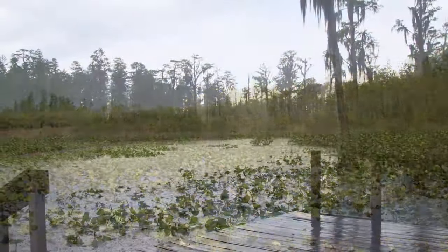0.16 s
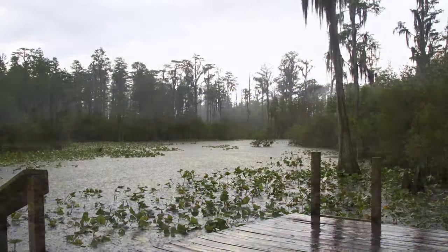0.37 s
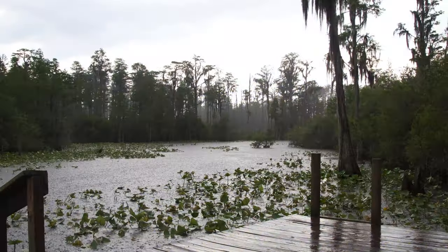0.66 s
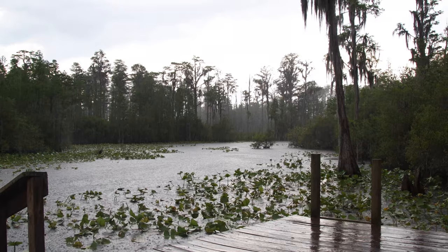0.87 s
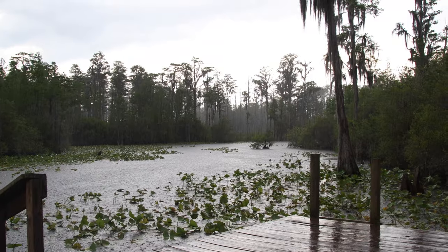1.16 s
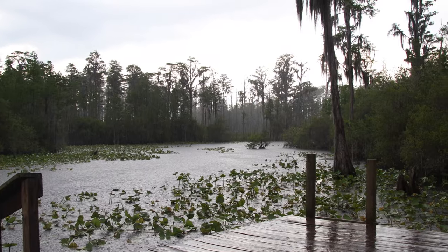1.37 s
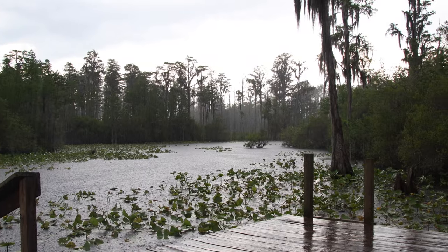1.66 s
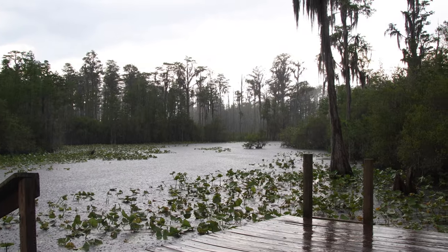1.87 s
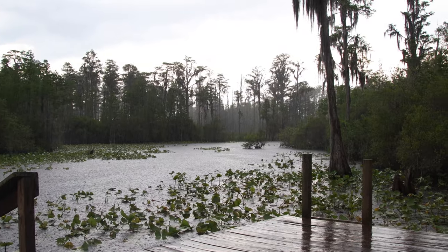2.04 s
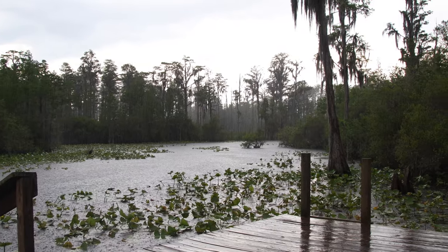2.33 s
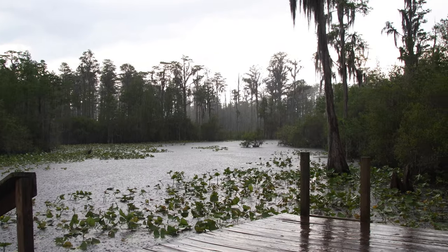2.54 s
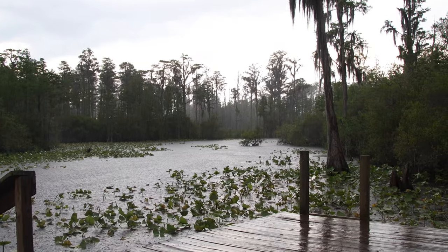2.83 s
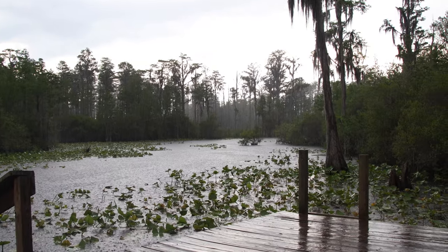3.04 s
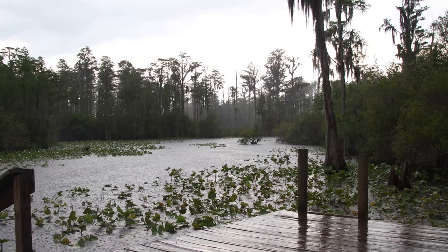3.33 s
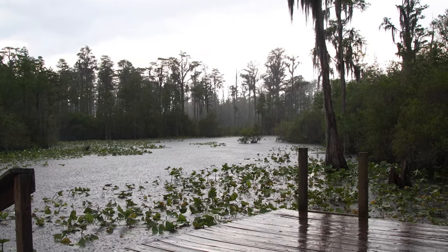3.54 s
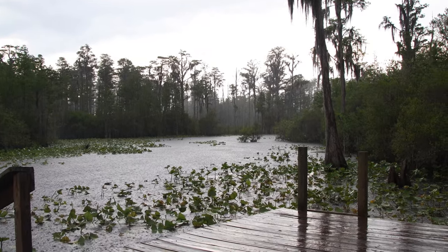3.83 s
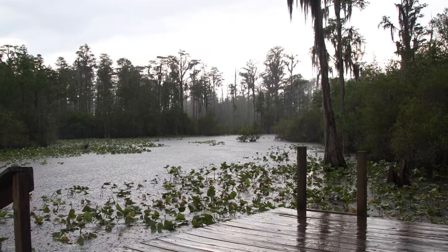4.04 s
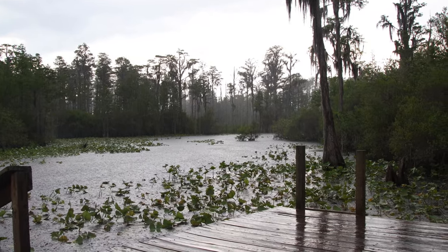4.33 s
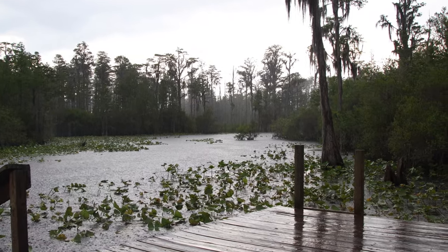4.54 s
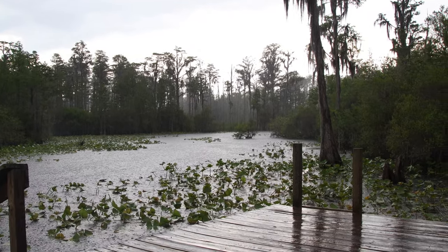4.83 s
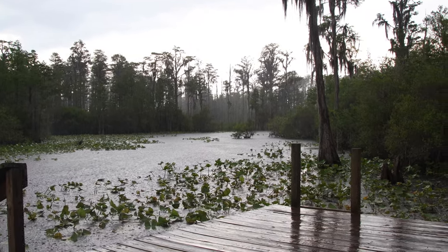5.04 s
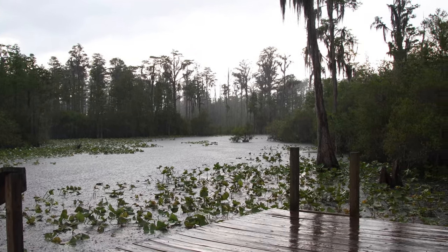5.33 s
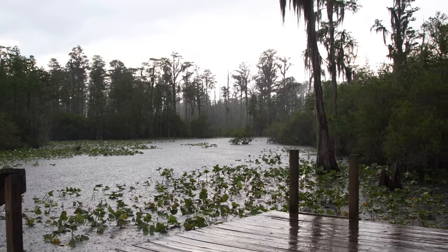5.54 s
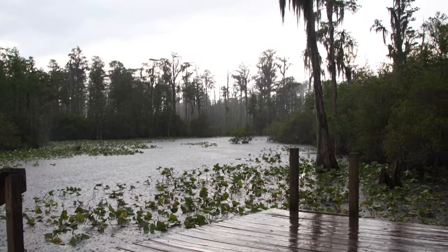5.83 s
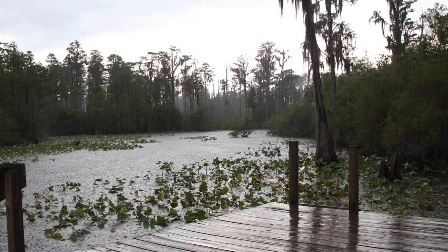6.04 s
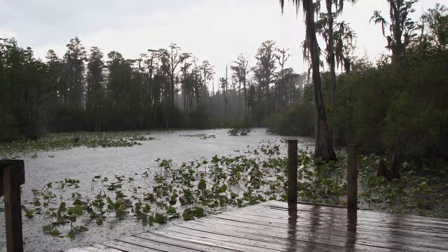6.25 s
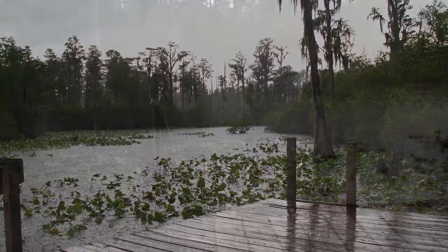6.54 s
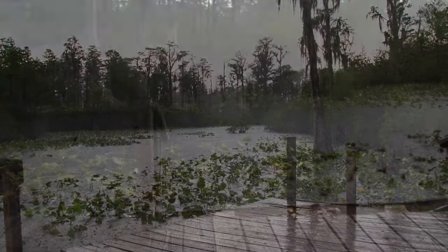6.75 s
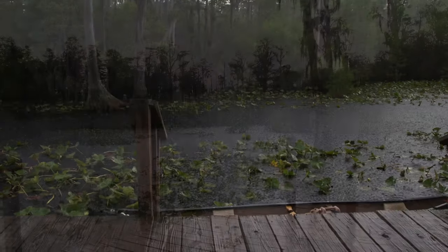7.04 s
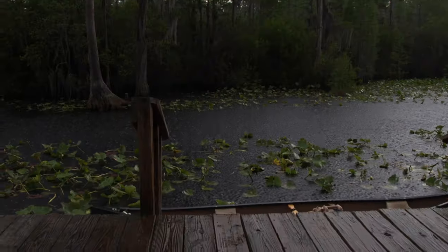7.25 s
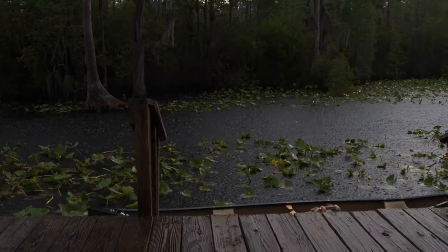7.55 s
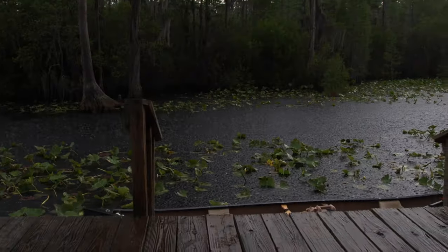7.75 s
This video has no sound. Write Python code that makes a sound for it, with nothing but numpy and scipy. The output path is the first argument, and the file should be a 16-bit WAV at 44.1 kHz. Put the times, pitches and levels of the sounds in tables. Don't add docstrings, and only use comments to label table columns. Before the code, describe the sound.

A tiny fading frog chirp opens, then heavy rain swells to full level almost at once and stays steady. Countless splashes on swamp water blend into a dense hiss, with bright ticks on a rail, knocks on dock boards and rare plops close by. Near the end it blends into a slightly different view of the same rain. Outdoors, wide stereo, small camera under shelter.

```python
import sys
import numpy as np
from scipy import signal
from scipy.fft import rfft, irfft, next_fast_len
from scipy.io import wavfile
from scipy.ndimage import uniform_filter1d

SR = 44100
rng = np.random.default_rng(int(sys.argv[2]) if len(sys.argv) > 2 else 0)


def to_linear_factor(level_db):
    exponent = np.asarray(level_db, float) / 20
    return 10 ** exponent


def materialize(psi):
    bounded = np.clip(np.atleast_2d(psi).T, -1, 1)
    quanta = np.round(bounded * 32767).astype(np.int16)
    wavfile.write(sys.argv[1], SR, quanta)


N = 348610

# start_s, sum_db, difference_db, dulled_above_hz
SHELTER_SMACKS = [
    (0.3, -19, -17, 4500),
    (.5128, -32, -27, 12000),
    (1.494, -31, -30, 12000),
    (2.5852, -28, -23, 12000),
    (2.593, -36, -30, 12000),
    (3.9662, -38, -33, 12000),
]


def evened(x):
    return x / np.sqrt(np.mean(x ** 2) + 1e-20)


def read(points, hz, axis=1):
    rows = np.transpose(points)
    return np.interp(np.log(hz + 1), np.log(rows[0] + 1), rows[axis])


def add(mix, start_s, sound):
    part = mix[:, round(start_s * SR):][:, :sound.shape[1]]
    part += sound[:, :part.shape[1]]


def wash(patchy_db, flicker_db):
    splash_per_s, splash_db, splash_decay_s = 13, 1.77, 0.014
    splash_hz, splash_octaves = 3280, 0.8
    hop = 64
    frames = N // hop + 5
    hz = np.fft.rfftfreq(256, 1 / SR)[:, None]
    a, b, c, d, patches = rng.standard_normal((frames, 129, 5)).T
    patches = uniform_filter1d(patches, size=5, axis=0)
    patches = evened(uniform_filter1d(patches, size=50, axis=1))
    flicker = evened(uniform_filter1d(rng.standard_normal(frames), size=12))
    treble = np.clip(hz / 4000, 0, 1)
    hits = rng.exponential(1, frames) * (rng.random(frames) < splash_per_s * hop / SR)
    decay = np.exp(-hop / SR / splash_decay_s)
    splash = signal.lfilter([1], [1, -decay], np.minimum(hits, 2))
    band = np.exp(-(np.log2((hz + 1) / splash_hz) / splash_octaves) ** 2)
    level_db = patchy_db * patches + flicker_db * treble * flicker + splash_db * band * splash
    spectra = np.array([a + 1j * b, c + 1j * d]) * to_linear_factor(level_db)
    return evened(signal.istft(spectra, nperseg=256, noverlap=192)[1][:, :N])


def patter(per_s, spread_db, low_hz, high_hz, cycles):
    size = to_linear_factor(spread_db * np.minimum(rng.exponential(1, N), 3.3))
    size = size * (rng.random(N) < per_s / SR)
    kind = rng.integers(0, 14, N)
    t = np.arange(600) / SR
    out = np.zeros((2, N))
    for k, hz in enumerate(np.geomspace(low_hz, high_hz, num=14)):
        damped = np.exp(-t * hz / cycles) * np.sin(2 * np.pi * hz * t) * np.sqrt(hz)
        bearing = rng.uniform(0, 2 * np.pi)
        rings = signal.oaconvolve(size * (kind == k), damped)[:N]
        out += np.outer([np.cos(bearing), np.sin(bearing)], rings)
    return evened(out)


def viewpoint(k):
    # hz, gain_db
    sum_response = [
        [(15, -57), (25, -47), (54, -5.5), (112, -10.5), (150, 1), (255, -5.5), (300, -2), (361, -5.5),
         (944, -6.5), (1370, -2), (4810, -19.5), (7000, -20), (9140, -29.5), (11600, -23), (14800, -43.5)],
        [(15, -56), (25, -32), (51, -7), (112, -6.5), (150, 2), (525, -5.5), (1340, -2), (3690, -16.5),
         (4560, -24), (9390, -32), (11000, -28.5), (12600, -33), (14800, -60)],
    ]
    # hz, gain_db
    difference_response = [
        [(35, -69), (60, -63), (87, -36), (488, -10.5), (830, -9.5), (1380, -2), (1770, -4), (2180, -4.5),
         (4260, -7), (4890, -11), (6750, -7.5), (8700, -17), (11200, -10.5), (13800, -25), (14800, -41)],
        [(35, -71), (60, -45), (294, -13), (456, -11), (674, -7), (757, -9), (1290, -1.5), (2230, -2.5),
         (4070, -9), (6910, -18.5), (7400, -19), (10700, -18), (14800, -36)],
    ]
    difference_db = [-4.5, -5]
    # hz, in_step (lean to one side, -1..1), quarter_turn (arrival lag, -1..1)
    likeness = [
        [(172, -0.24, -0.08), (516, -0.4, -0.17), (1033, -0.26, -0.23), (1722, -0.41, -0.24),
         (2756, -0.2, -0.25), (4230, -0.49, -0.14), (5684, -0.24, -0.11), (7579, 0.11, -0.01),
         (10335, 0.03, 0.13), (13781, 0.01, 0.06)],
        [(172, -0.08, -0.01), (516, -0.11, -0.05), (1033, -0.11, -0.01), (1722, -0.12, 0.0),
         (2756, -0.03, -0.03), (4134, -0.09, -0.02), (5684, -0.21, -0.04), (7579, 0.13, 0.0),
         (10335, 0.09, -0.1), (13781, -0.05, 0.03)],
    ]
    # center_hz, width_hz, gain_db
    cavities = [
        (1348, 140, 3),
        (2190, 320, 3),
        (3950, 1400, 2),
    ]

    rain = wash(patchy_db=0.66, flicker_db=1.0)
    rain = rain + to_linear_factor(-16.5) * patter(700, 2.6, 910, 4930, 1.42)
    rain = rain + to_linear_factor(-20.0) * patter(500, 6.2, 5400, 17000, 0.99)
    size = next_fast_len(N)
    hz = np.fft.rfftfreq(size, 1 / SR)
    front, flank = rfft(rain, size)
    link = read(likeness[k], hz) + 1j * read(likeness[k], hz, axis=2)
    tied = link * front + np.sqrt(np.clip(1 - abs(link) ** 2, 0, 1)) * flank
    mid = front * to_linear_factor(read(sum_response[k], hz))
    side = tied * to_linear_factor(read(difference_response[k], hz) + difference_db[k])
    housing_db = sum(db / (1 + (2 * (hz - at) / width) ** 2) for at, width, db in cavities)
    pair = np.array([mid, side]) * to_linear_factor(housing_db)
    rumble = 1 / (1 + (hz / 300) ** 4)
    fizz = 1 / (1 + (4500 / (hz + 1)) ** 4)
    bands = np.array([1 - rumble - fizz, rumble, fizz])[:, None]
    layers = irfft(pair * bands, size)[..., :N]
    return layers / np.std(layers[0, 0])


def downpour():
    # time_s, level_db
    gusts = [(0, -0.4), (2.0, 0.3), (2.75, -0.3), (3.1, 0.9), (3.6, -0.2), (3.95, -0.3), (4.4, 0),
             (5.0, 0.3), (6.0, 0.5), (6.4, 0.45), (7.15, 0.5), (7.45, 0.1), (7.9, .2)]
    rain_db, rumble_db, fizz_db = -31.5, -0.6, [-1.2, 4.5]
    fade_from_db, fade_step_db, fade_in_s = -7.5, -2, 0.22
    surge_db, surge_s = 4.5, 0.12
    cross_start_s, cross_s, second_db = 6.444, 0.64, -0.4

    t = np.arange(N) / SR
    rising_db = fade_from_db + (fade_step_db - fade_from_db) * t / fade_in_s
    fade_db = rising_db * np.clip((fade_in_s - t) / 0.016 + 1, 0, 1)
    level_db = rain_db + fade_db + np.interp(t, *np.transpose(gusts))
    rumble_gain = to_linear_factor(rumble_db + surge_db * np.exp(-t / surge_s))
    second = np.clip((t - cross_start_s) / cross_s, 0, 1)
    out = np.zeros((2, N))
    for k, share in enumerate([1 - second, second * to_linear_factor(second_db)]):
        body, rumble, fizz = viewpoint(k)
        out += share * (body + rumble_gain * rumble + to_linear_factor(fizz_db[k]) * fizz)
    return to_linear_factor(level_db) * out


def ring(hz, mid_db, side_db, lead_rad, t60_s, tick=0):
    t = np.arange(round(t60_s * SR)) / SR
    shape = 1.4 * (1 - np.exp(-t / 0.00034)) * to_linear_factor(-60 * t / t60_s)
    crack = tick * rng.standard_normal(len(t)) * np.exp(-t / 0.0006)
    dull = np.exp(-2 * np.pi * 1.4 * hz / SR)
    crack = signal.lfilter([1 - dull], [1, -dull], crack)
    tone = shape * np.sin(2 * np.pi * hz * t + np.array([[0], [lead_rad]]))
    return to_linear_factor(np.array([[mid_db], [side_db]])) * (tone + crack)


def frog_chirp():
    gap_s, sink_db_per_s = 0.0039, -400
    out = np.zeros((2, N))
    for k, (a, b, c) in enumerate(rng.uniform(-1.7, 1, (12, 3))):
        late_s = gap_s * (k + 0.084 * a)
        db = -18 + sink_db_per_s * late_s + 1.0 * b
        if k == 0:
            db -= 5
        add(out, 0.0102 + late_s, ring(4100 * (1 + 0.01 * c), db - 7.5, db, lead_rad=2.2, t60_s=0.012))
    return out


def struck(drops, hz, spread, sum_db, lead_rad, t60_s):
    out = np.zeros((2, N))
    scatter = rng.uniform(-0.89, 1, (len(drops), 2))
    for (start_s, db), (a, b) in zip(drops, scatter):
        pitch_hz = hz * (1 + spread * a)
        add(out, start_s, ring(pitch_hz, db + sum_db, db, lead_rad + 0.8 * b, t60_s, tick=0.63))
    return out


def rail_drops():
    # start_s, level_db
    rail_hits = [(0.2876, -33), (0.4618, -40), (0.5128, -35), (1.006, -20), (1.4941, -26), (1.6859, -28),
                 (1.8848, -31), (1.96, -37), (2.0109, -25), (2.0793, -20), (2.1355, -24), (2.2811, -29),
                 (2.5861, -27), (2.7274, -34), (2.9972, -37), (3.1783, -33), (3.9659, -28), (4.2998, -31),
                 (4.4582, -25), (4.7468, -28), (6.5139, -27), (6.9815, -31.5), (7.5162, -27)]
    return struck(rail_hits, hz=11100, spread=0.04, sum_db=-9, lead_rad=1.0, t60_s=0.0035)


def pad_drops():
    # start_s, level_db
    pad_hits = [(0.2976, -33), (4.2999, -33), (5.2021, -34), (5.4309, -33), (5.6783, -35), (5.9087, -28),
                (6.2087, -31), (6.382, -25), (6.7589, -38)]
    return struck(pad_hits, hz=6600, spread=0.0309, sum_db=-9, lead_rad=1, t60_s=0.03)


def board_drops():
    # start_s, level_db
    board_hits = [(0.2983, -29), (0.5936, -29), (0.6066, -31), (0.7947, -23), (0.9546, -24), (1.268, -25),
                  (2.1371, -26), (2.281, -30), (2.5097, -28), (3.4983, -34), (4.167, -25), (4.573, -25),
                  (6.9651, -30), (7.0961, -40)]
    return struck(board_hits, hz=4050, spread=0.05, sum_db=-1, lead_rad=3.1, t60_s=0.007)


def puddle_drops():
    # start_s, level_db
    puddle_hits = [
        (0.2988, -20.5),
        (3.024, -27),
        (5.0895, -29),
        (6.1586, -28),
    ]
    return struck(puddle_hits, hz=2370, spread=0.01, sum_db=2.6, lead_rad=3.5, t60_s=0.015)


def shelter_smacks():
    out = np.zeros((2, N))
    t = np.arange(200) / SR
    for start_s, mid_db, side_db, dull_hz in SHELTER_SMACKS:
        burst = rng.standard_normal((2, len(t))) * np.exp(-t / 0.00098)
        crack = signal.lfilter(*signal.butter(2, dull_hz, fs=SR), burst)
        add(out, start_s, to_linear_factor(np.array([[mid_db], [side_db]])) * crack)
    return out


def scene():
    near = rail_drops() + pad_drops() + board_drops() + puddle_drops() + shelter_smacks()
    mid, side = downpour() + frog_chirp() + near
    return np.array([mid + side, mid - side])


def thinned(mid, uneven_db, shared_db):
    usual_db, early_db, early_ragged = -1.5, -4.5, 0.63
    recover_s, recover_width_s = 1.7, 0.14
    spared_db, spared_s = 9, 0.022

    hz, t, spectrum = signal.stft(mid, SR, nperseg=1024, noverlap=768)
    blocks = rng.standard_normal((len(hz) // 10 + 1, len(t) // 6 + 1))
    blocks = np.kron(blocks, np.ones((10, 6)))[:len(hz), :len(t)]
    blocks = uniform_filter1d(blocks, size=3, axis=1)
    frames = uniform_filter1d(rng.standard_normal(len(t)), size=6) * np.sqrt(6)
    early = 1 / (1 + np.exp((t - recover_s) / recover_width_s))
    spared = sum(np.exp(-((t - row[0]) / spared_s) ** 2) for row in SHELTER_SMACKS[1:])
    ragged_db = (1 + early_ragged * early) * (uneven_db * blocks + shared_db * frames)
    gain_db = ragged_db + usual_db + early_db * early + spared_db * spared
    treble = 1 / (1 + (7200 / (hz[:, None] + 1)) ** 12)
    spectrum = spectrum * to_linear_factor(treble * np.minimum(gain_db, 4.0))
    return signal.istft(spectrum, SR, nperseg=1024, noverlap=768)[1][:N]


def band_limit(x):
    return signal.sosfilt(signal.butter(12, 15000, fs=SR, output="sos"), x)


def record(dry):
    mid, side = (dry[0] + dry[1]) / 2, (dry[0] - dry[1]) / 2
    mid = thinned(mid, uneven_db=5.5, shared_db=0.5)
    return band_limit(np.array([mid + side, mid - side]))


dry = scene()
out = record(dry)
materialize(out)
```